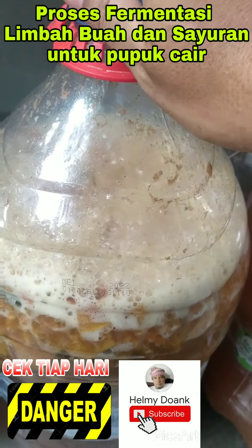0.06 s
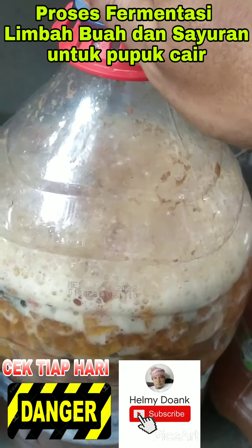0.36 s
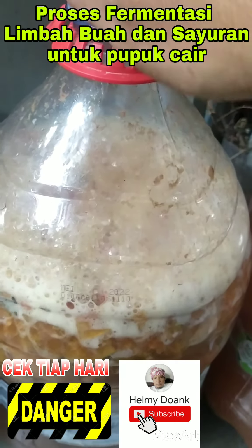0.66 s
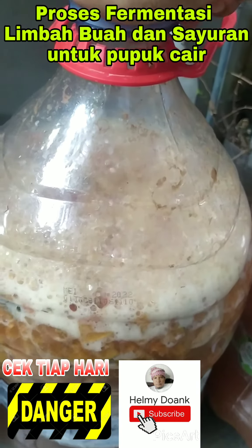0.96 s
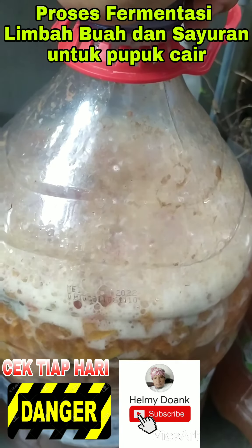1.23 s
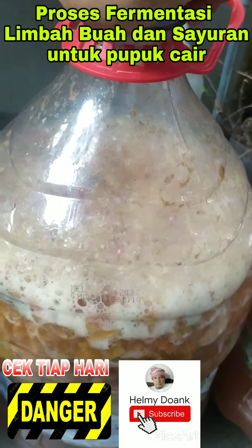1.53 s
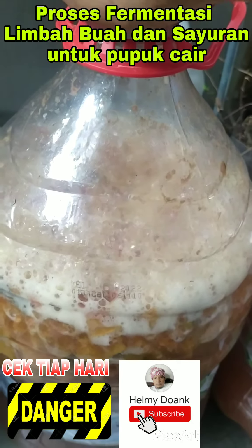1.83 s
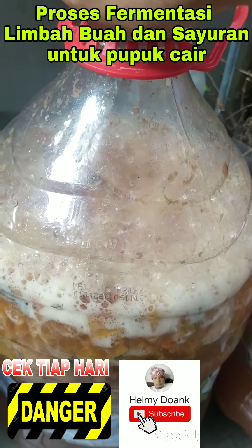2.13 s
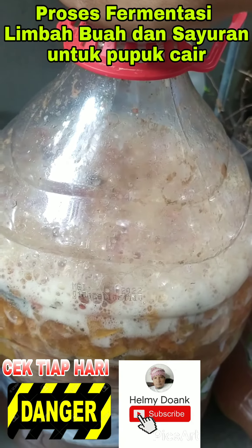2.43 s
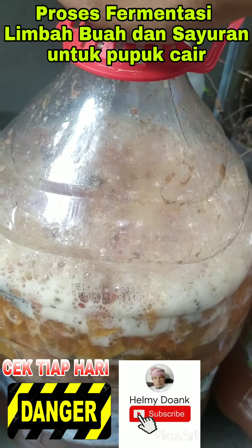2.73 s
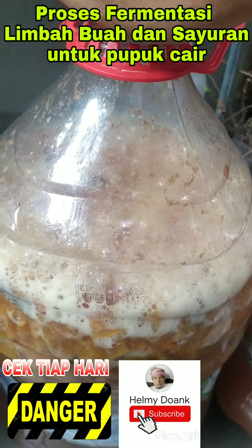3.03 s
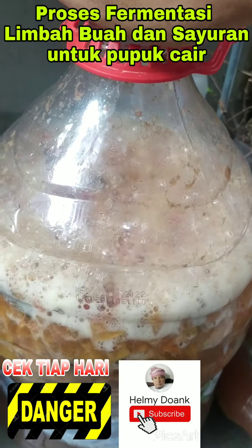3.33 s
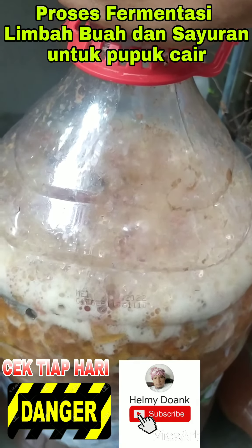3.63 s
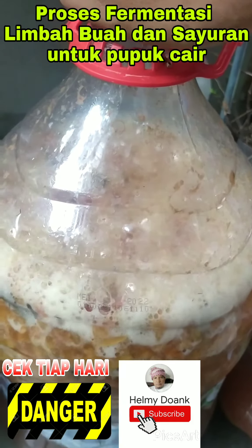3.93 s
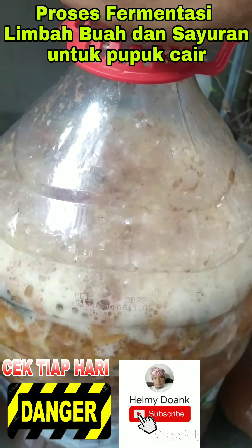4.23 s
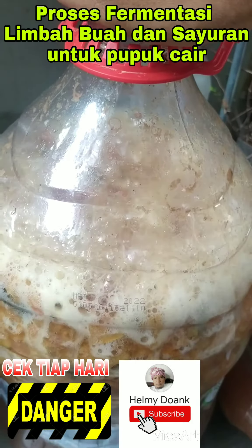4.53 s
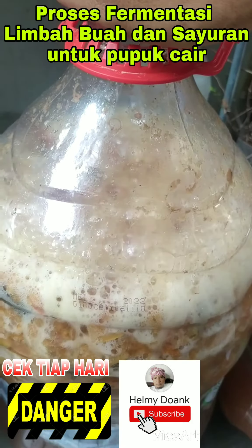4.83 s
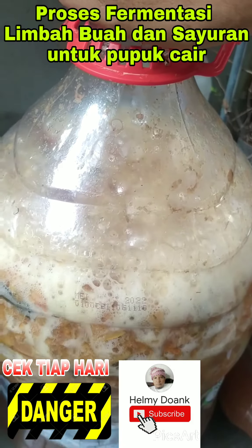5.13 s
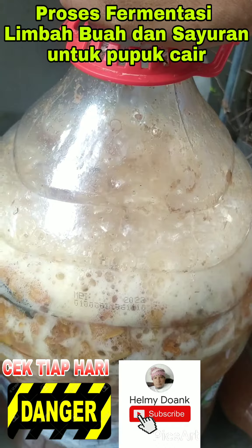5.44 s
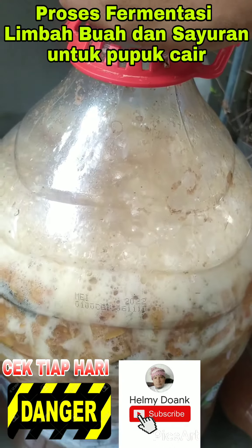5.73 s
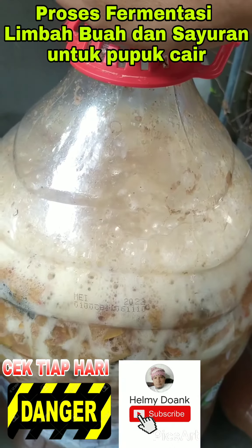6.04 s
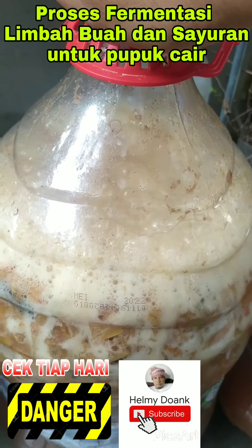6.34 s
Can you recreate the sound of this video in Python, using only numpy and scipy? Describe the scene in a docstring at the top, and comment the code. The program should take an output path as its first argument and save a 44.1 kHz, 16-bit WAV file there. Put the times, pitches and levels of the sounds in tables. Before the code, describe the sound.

For the first two seconds a hand slowly turns the cap of a big plastic bottle, close by: faint rubbing, a few tiny squeaks and gritty ticks, each lightly knocking the hollow wall. At about 1.5 seconds a thin, high leak fades in, and near 2 seconds there is one short, low gulp that drops in pitch. At 2.5 seconds gas starts to hiss out more strongly. From 3.3 seconds it swells into a bright, slightly sputtering hiss, loudest around 4 seconds, then sags. It swells again just after 5 seconds and cuts off quickly at about 5.8 as the cap shuts. A last soft tick and rub come at 6.2 seconds. The room is quiet, with short reflections off nearby walls. Underneath lie a low rumble, soft air, a faint high hiss and a distant motor hum that comes and goes.

```python
"""In a room, a hand slowly loosens the cap of a big plastic bottle of fermenting fruit.
The cap rubs, squeaks and ticks as it sticks and slips; each tick rings the bottle wall.
A thin leak starts, a low gulp sounds, then turbulent gas hisses through the thread in three swells,
coloured by cavities under the cap, until the cap shuts. Nearby walls throw the sound back.
Behind it are a faint far motor, a low rumble, soft air and a narrow high hiss."""
import sys
import numpy as np
from scipy import signal
from scipy.fft import rfft, irfft
from scipy.io import wavfile
from scipy.ndimage import map_coordinates

SR = 44100
rng = np.random.default_rng(int(sys.argv[2]) if len(sys.argv) > 2 else 0)


def store_wav(level_fs):
    """Save 16-bit WAV to argv[1]."""
    pcm = np.round(np.clip(np.atleast_2d(level_fs), -1, 1) * 32767)
    wavfile.write(sys.argv[1], SR, pcm.T.astype(np.int16))


N = 285768
TIME = np.arange(N) / SR
BINS = np.fft.rfftfreq(N, 1 / SR)

# cap turns that open the gap: start/s, opening/s, level/dB, hold/s
CAP_TURNS = [(2.54, 0.41, -33, 0.19), (3.31, 0.43, -22.5, 0.45), (3.82, 0.15, -24.5, 0.013),
             (5.05, 0.17, -29.5, 0.18)]
# thread ticks: t/s, relative level/dB, tilt/(dB/octave), t60/s, relative knock level/dB
THREAD_TICKS = [(.160, -56, 0, 0.035, -11), (.243, -60, 8, 0.09, -25), (0.363, -54, 11, 0.055, -22),
                (.905, -52.5, 9.5, 0.085, -4), (1.089, -60.5, 7, 0.17, -8), (1.187, -52, 10, 0.13, -25),
                (1.305, -52, 2.5, 0.065, -19), (1.401, -54, 1, 0.063, -9), (1.901, -54.5, 10, 0.067, -12),
                (6.163, -51.5, 4.5, 0.1, -13)]


def jet(shut_s=5.685, shutting_s=0.12, body_lag_s=0.024, body_db=2.0, sputter_db=0.64, flutter_db=0.3):
    """Turbulence in the wet thread; foam makes it sputter, and the low body outlasts the treble."""
    spectrum = [(500, -26), (1200, -21.5), (1500, -11.5), (1850, -10), (2400, -13.5), (3200, -6),
                (3600, -4.5), (4900, -1), (5400, -2), (6100, -2.5), (7200, -1.9), (9800, 4), (11300, 1.5),
                (12500, -1.5), (15700, -2)]  # jet noise: f/Hz, relative level/dB
    gas = cap_cavities(spread(read(spectrum)))
    wet = lowpass(gas, 7000, order=8)
    gas = gas - wet + wet * unit_rms(gain_of(sputter_db * wander(54)))
    body = lowpass(gas, 2600, order=8)
    treble = (gas - body) * (1 - ramp(shut_s, shutting_s))
    body = body * (1 - ramp(shut_s + body_lag_s, shutting_s)) * gain_of(body_db)
    return (treble + body) * flow() * gain_of(flutter_db * wander(22))


def flow(drain_s=0.69):
    """Each turn opens the gap; the flow holds, then sags with the pressure. Turns add in power."""
    power = 0
    for start_s, opening_s, db, hold_s in CAP_TURNS:
        sag = (1 + np.maximum(TIME - start_s - opening_s - hold_s, 0) / drain_s) ** 2
        power += (ramp(start_s, opening_s) * gain_of(db) / sag) ** 2
    return np.sqrt(power)


def seep(start_s=1.49, grow_s=0.93, fade_s=0.82, level_db=-49.5, widening_db=13.5, flutter_db=1.0):
    """Thin, high pinhole leak past the seal; the first turn widens it, from the second it fades."""
    spectrum = [(1000, -24), (1500, -12), (1900, -8), (2600, -19), (3300, -4.5), (4000, -12), (5000, -7),
                (6000, -6.5), (7400, -10), (8100, -8), (9500, -1), (11500, -2), (13400, 5.5), (15700, -5)]  # leak noise: f/Hz, relative level/dB
    envelope = np.clip((TIME - start_s) / grow_s, 0, 1) * (1 - ramp(CAP_TURNS[1][0], fade_s))
    db = level_db + widening_db * ramp(*CAP_TURNS[0][:2]) + flutter_db * wander(30)
    return cap_cavities(spread(read(spectrum))) * envelope * gain_of(db)


def cap_cavities(x, slack_s=4.16, slackening_s=0.54, sag_per_s=0.011,
                 ripple_db=2.4, ripple_hz=60, ripple_s=0.35):
    """Air cavities under the cap colour the hiss, changing as the gap widens and the pressure drops."""
    # resonances: f/Hz, width/Hz, narrow-gap lift/dB, wide-gap lift/dB, low-pressure lift/dB
    cavities = [(750, 260, 7.5, 0.5, 6), (910, 88, 0, 5, -9), (1890, 170, 7, 4.5, 1),
                (3040, 210, 5, 8.5, 2), (3954, 340, 12.5, 7.5, 9), (4490, 150, 2, -11, -11),
                (7140, 400, 5, 3.5, 4.5), (9830, 250, 1, 1, -0.5), (11060, 590, -10, -2.5, -2.5),
                (13600, 1100, -2.5, 4, 2.3)]
    hz, t, frames = signal.stft(x, SR, nperseg=2048, noverlap=1536)
    wide = np.interp(t, TIME, ramp(*CAP_TURNS[1][:2]))
    slack = np.interp(t, TIME, ramp(slack_s, slackening_s))
    pitch = 1 - sag_per_s * (t - CAP_TURNS[1][0])  # cavities grow as the cap lifts
    lift_db = 0
    for centre_hz, width_hz, narrow_db, wide_db, slack_db in cavities:
        peak_db = narrow_db + (wide_db - narrow_db) * wide + (slack_db - wide_db) * slack
        lift_db += peak_db / (1 + (2 * (hz[:, None] - centre_hz * pitch) / width_hz) ** 2)
    # reflections off the moving hand: shifting ripple, half shared by left and right
    grid = np.meshgrid(hz / ripple_hz, t / ripple_s, indexing="ij")
    shared, *sides = rng.standard_normal((3, int(hz[-1] / ripple_hz) + 2, int(t[-1] / ripple_s) + 2))
    ripple = np.array([map_coordinates((shared + side) / np.sqrt(2), grid, order=2, mode="mirror")
                       for side in sides])
    frames = frames * gain_of(lift_db + ripple_db * ripple)
    return unit_rms(signal.istft(frames, SR, nperseg=2048, noverlap=1536)[1][:, :N])


def spread(spectrum_db, direct_share=0.35, left_lag_ms=0.275, spit_db=0.2, echo_rad=1.0, ripple_db=1.6):
    """Stereo hiss: a direct part that arrives first on the right, plus a diffuse part off the walls."""
    balance = [(600, -1.5), (1150, -4.5), (1600, 3), (1900, 12), (2400, 4), (3200, 3), (4300, 4), (5500, 3),
               (9000, 1), (11400, 4), (14000, 2.5)]  # hiss balance: f/Hz, left minus right/dB
    eddies, *diffuse = rng.standard_normal((3, N))
    eddies = eddies * gain_of(spit_db * wander(990))
    # echoes off hand and bottle bend the phase
    phase = 2 * np.pi * BINS * left_lag_ms / 1000 + echo_rad * spectral_ripple(400)
    direct = np.array([irfft(rfft(eddies) * np.exp(-1j * phase), N), eddies])
    pair = np.sqrt(direct_share) * direct + np.sqrt(1 - direct_share) * np.array(diffuse)
    reflections_db = ripple_db * np.array([spectral_ripple(30), spectral_ripple(30)])
    side_db = np.array([read(balance), -read(balance)]) / 2
    return unit_rms(coloured(pair, spectrum_db + reflections_db + side_db))


def rub(grain_db=4.5, grain_hz=350):
    """Palm and cap stick and slip round the neck; faster strokes are brighter."""
    spectrum = [(400, -7), (1400, -9), (2100, -0.5), (4000, 2.5), (7000, 3), (12000, -4.5), (15700, -16)]  # friction noise: f/Hz, relative level/dB
    strokes = [(0.027, 0.11, -63, -4), (.165, 0.087, -58.5, -4), (0.25, 0.068, -53.5, -2.5),
               (0.382, 0.13, -53, -2.5), (0.471, 0.065, -49.5, 3), (0.58, 0.13, -67.5, -7.5),
               (0.815, 0.31, -64, -3), (1.21, 0.33, -59, -0.5), (1.49, 0.14, -57, 1),
               (1.675, 0.09, -58.5, 4), (1.886, 0.21, -55.5, 2.5), (6.173, 0.076, -53.5, 1),
               (6.332, 0.42, -66.5, -12)]  # hand strokes: middle/s, length/s, level/dB, treble lift and bass cut/dB
    slips = rng.standard_normal(N) * gain_of(grain_db * wander(grain_hz))
    slips = unit_rms(coloured(slips, read(spectrum)))
    dull = lowpass(slips, 4500, order=4)
    bright = slips - dull
    return sum((dull * gain_of(db - tilt_db) + bright * gain_of(db + tilt_db)) * swell(t, length_s)
               for t, length_s, db, tilt_db in strokes)


def ticks(gain_db=6.5, rise_s=0.0031, grit_db=5.0):
    """Gritty scuffs of plastic on plastic in the thread."""
    spectrum = [(200, 9), (600, 12.5), (1200, 2), (1750, 18.5), (2500, 4), (3800, 12), (5500, 2.5),
                (8500, -7.5), (12000, -19), (15700, -29)]  # scuff noise: f/Hz, relative level/dB
    octaves = np.log2(np.maximum(BINS, 200) / 3000)
    out = np.zeros(N)
    for start_s, db, tilt, t60_s, _ in THREAD_TICKS:
        age_s = np.clip(TIME - start_s, 0, 1)
        scuff = noise(read(spectrum) + tilt * octaves)
        attack = 1 - np.exp(-age_s / rise_s)
        out += scuff * attack * gain_of(db + grit_db * wander(550) - 60 * age_s / t60_s)
    return out * gain_of(gain_db)


def knocks(gain_db=-0.5):
    """Each tick knocks the hollow bottle, whose wall rings briefly."""
    modes = [(192, 11, 0.08), (407, 11.5, 0.032), (583, 5, 0.043), (760, 17, 0.012), (990, 16, 0.012),
             (1135, 8, 0.039), (1850, 1, 0.025)]  # bottle wall: f/Hz, relative level/dB, t60/s
    t = np.arange(SR // 4) / SR
    ring = sum((-1) ** k * np.sin(2 * np.pi * hz * t) * gain_of(db - 60 * t / t60_s)
               for k, (hz, db, t60_s) in enumerate(modes))
    return sum(np.interp(TIME - start_s, t, ring, right=0) * gain_of(gain_db + db + knock_db)
               for start_s, db, _, _, knock_db in THREAD_TICKS)


def squeaks(rough_db=3.0):
    """Brief, rough stick-slip squeals as the grip tightens and the seal drags."""
    squeals = [(0.347, 0.06, 2430, 478, -60), (1.035, 0.066, 5080, 150, -63),
               (1.185, 0.091, 5630, 150, -58), (1.276, 0.077, 5580, 200, -63)]  # plastic squeals: middle/s, length/s, f/Hz, scatter/Hz, level/dB
    out = sum(tone(hz, waver=scatter_hz / hz, waver_hz=407, second_db=-15)
              * gain_of(db) * swell(t, length_s) for t, length_s, hz, scatter_hz, db in squeals)
    return out * gain_of(rough_db * wander(90))


def gulp(start_s=1.938, rise_s=0.024, hold_s=0.052, fall_s=0.02, level_db=-43, growth_db_per_s=85.0,
         from_hz=300, to_hz=186, glide_s=0.0405):
    """One low note, like a gulp in the bottle: it grows while its pitch drops, then stops."""
    hz = from_hz + (to_hz - from_hz) * ramp(start_s, glide_s) ** 2
    end_s = start_s + rise_s + hold_s
    envelope = ramp(start_s, rise_s) * (1 - ramp(end_s, fall_s))
    db = level_db - growth_db_per_s * np.maximum(end_s - TIME, 0)
    return tone(hz, waver=0.091, waver_hz=70.7, second_db=-15.5) * envelope * gain_of(db)


def room(x, wet_db, gap_s=0.002):
    """Direct sound plus a short dense tail off the walls, different left and right."""
    decay = [(200, 0.18), (1500, 0.18), (6000, 0.059), (15000, 0.16)]  # room decay: f/Hz, t60/s
    t = np.arange(SR // 2) / SR
    taps = rng.standard_normal((2, len(t))) * (t > gap_s)
    hz, age_s, frames = signal.stft(taps, SR, nperseg=256)
    tail = signal.istft(frames * gain_of(-60 * age_s / read(decay, hz)[:, None]), SR, nperseg=256)[1]
    tail /= np.linalg.norm(tail, axis=1, keepdims=True)
    wet = gain_of(wet_db)
    return (x + wet * signal.fftconvolve(x[None], tail, axes=1)[:, :N]) / np.hypot(1, wet)


def motor():
    """A faint far motor: a wavering low hum that comes and goes."""
    hums = [(2.19, 0.29, 288, -56.5), (3.098, 0.066, 205.4, -49), (3.193, 0.38, 264.3, -60),
            (4.652, 0.34, 203, -54), (5.036, 0.17, 203.3, -52), (5.381, 0.49, 239.3, -55),
            (5.493, 0.17, 198, -50.5), (5.988, 0.19, 176.5, -61)]  # hum swells: middle/s, length/s, f/Hz, level/dB
    return sum(tone(hz, waver=0.0468, waver_hz=30.4, second_db=-25.0) * gain_of(db) * swell(t, length_s)
               for t, length_s, hz, db in hums)


def background(rumble_db=-49.0, surge_db=5.5, drift_db=0.77, air_db=-57.5, air_db_per_s=0.9645,
               hiss_db=-57.0):
    """Low rumble that surges once, soft air that slowly grows, and a steady hiss near 10 kHz."""
    # background spectra: f/Hz, relative level/dB
    rumble_spectrum = [(20, -63), (35, -42), (50, -2), (65, 4.5), (90, -1), (130, -7.5), (200, -9.5),
                       (300, -42)]
    air_spectrum = [(100, -2.5), (200, 6), (280, -1.5), (420, -7.5), (550, -12.5), (1000, -13), (1300, -16),
                    (1700, -15), (2200, -23.5), (3200, -25.5), (5000, -40), (8000, -33), (12000, -76),
                    (15700, -72)]
    hiss_spectrum = [(7500, -49), (8500, -24), (9200, -8.5), (9850, -5), (10400, -7.5), (11000, -23),
                     (11600, -58)]
    surge = ramp(5.07, 0.67) * (1 - ramp(6.12, 0.45))
    rumble = ambient(rumble_spectrum, left_db=0.5)
    rumble *= gain_of(rumble_db + surge_db * surge - drift_db * wander(6.5))
    air = ambient(air_spectrum, left_db=2.0) * gain_of(air_db + air_db_per_s * TIME + 0.5 * surge)
    hiss = ambient(hiss_spectrum, left_db=7.5) * gain_of(hiss_db)
    return rumble + air + hiss


def ambient(spectrum, left_db):
    """Diffuse stereo noise, nearly alike on both sides in the bass."""
    coherence = [(60, 1), (150, 0.95), (300, 0.93), (600, 0.42), (1200, 0.031), (10000, 0.033)]  # diffuse field: f/Hz, left-right correlation
    left, other = rng.standard_normal((2, N))
    alike = read(coherence)
    right = irfft(alike * rfft(left) + np.sqrt(1 - alike ** 2) * rfft(other), N)
    pair = unit_rms(coloured(np.array([left, right]), read(spectrum)))
    return pair * gain_of([[left_db / 2], [-left_db / 2]])


def tone(hz, waver, waver_hz, second_db):
    """Wavering tone with its second harmonic."""
    phase = 2 * np.pi * np.cumsum(hz * (1 + waver * wander(waver_hz))) / SR
    return np.sqrt(2) * (np.sin(phase) + gain_of(second_db) * np.sin(2 * phase))


def noise(db):
    """Noise of rms 1 with the given spectrum."""
    return unit_rms(coloured(rng.standard_normal(N), db))


def wander(rate_hz):
    """Random drift of rms 1, mostly below rate_hz."""
    return noise(-10 * np.log10(1 + (BINS / rate_hz) ** 4))


def spectral_ripple(spacing_hz):
    """Random curve over the bins."""
    knots_hz = np.arange(0, SR / 2, spacing_hz)
    return np.interp(BINS, knots_hz, rng.standard_normal(len(knots_hz)))


def ramp(start_s, length_s):
    """Smooth step from 0 to 1."""
    return np.sin(np.pi / 2 * np.clip((TIME - start_s) / length_s, 0, 1)) ** 2


def swell(middle_s, length_s):
    """Bell of height 1, length_s wide at half height."""
    return 0.5 ** ((2 * (TIME - middle_s) / length_s) ** 2)


def read(points, hz=BINS):
    """Interpolates a table over log frequency."""
    table_hz, value = np.transpose(points)
    return np.interp(np.log(hz + 1), np.log(table_hz + 1), value)


def coloured(x, db):
    """Filters by a gain per bin."""
    return irfft(rfft(x) * gain_of(db), N)


def lowpass(x, corner_hz, order):
    """Zero-phase low-pass, 6 dB down at the corner."""
    return coloured(x, -20 * np.log10(1 + (BINS / corner_hz) ** order))


def gain_of(db):
    """Decibels to amplitude."""
    return 10 ** (np.asarray(db) / 20)


def unit_rms(x):
    """Scales to rms 1."""
    return x / np.sqrt(np.mean(x ** 2) + 1e-20)


def scene():
    """Gas and cap sounds in the room, over the background."""
    cap = room(rub() + ticks() + squeaks(), wet_db=16.5)
    bottle = room(knocks(), wet_db=1.0)
    handling = (cap + bottle) * gain_of([[1.5], [-1.5]])  # slightly left
    return jet() + seep() + handling + gulp() + motor() + background()


def record(dry, edge_hz=15830):
    """Steep treble band limit."""
    taps = signal.firwin(1023, edge_hz, window=("kaiser", 9), fs=SR)
    return signal.oaconvolve(dry, taps[None], "same")


dry = scene()
out = record(dry)
store_wav(out)
```